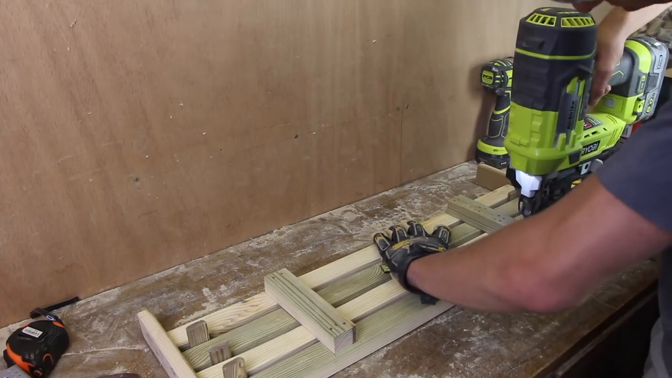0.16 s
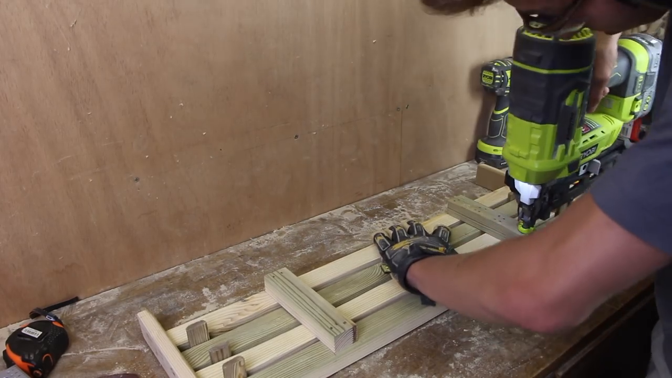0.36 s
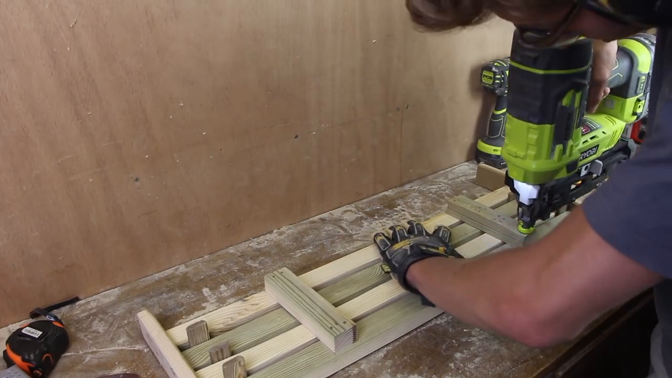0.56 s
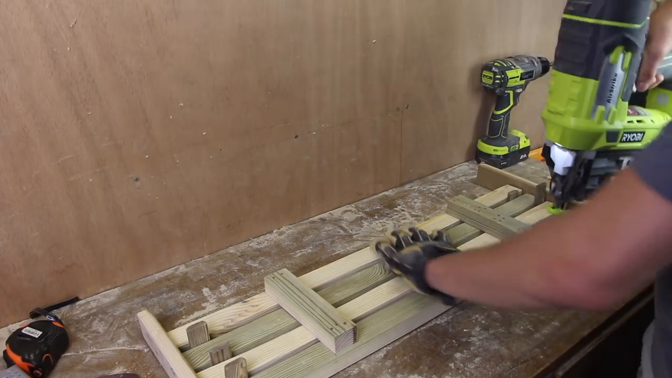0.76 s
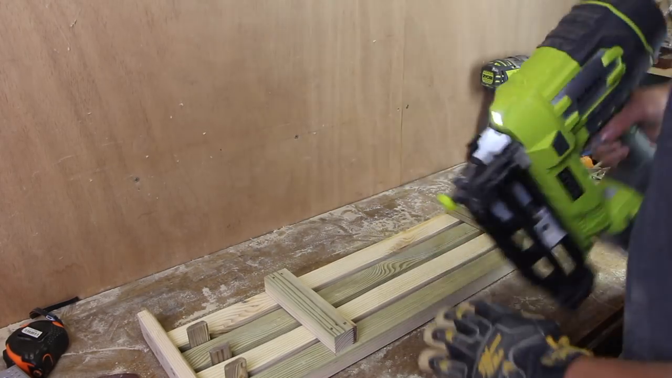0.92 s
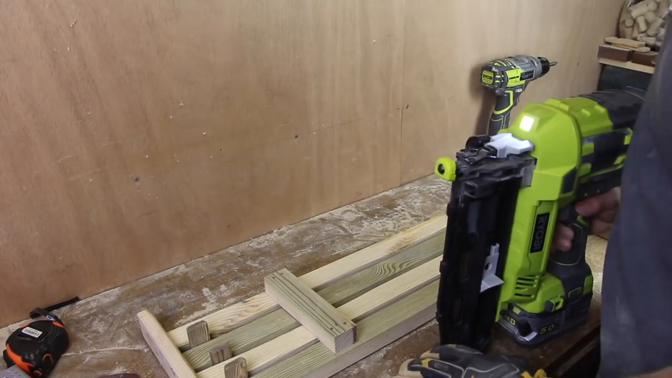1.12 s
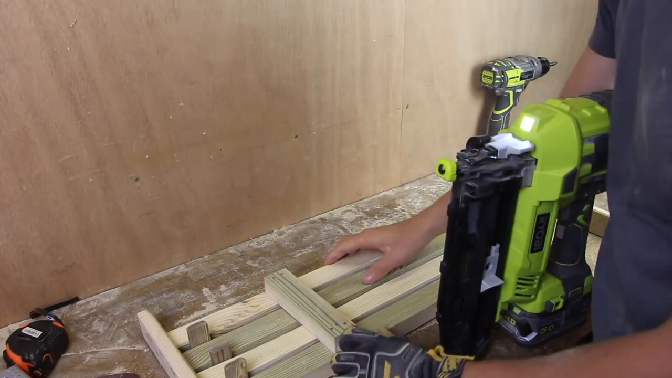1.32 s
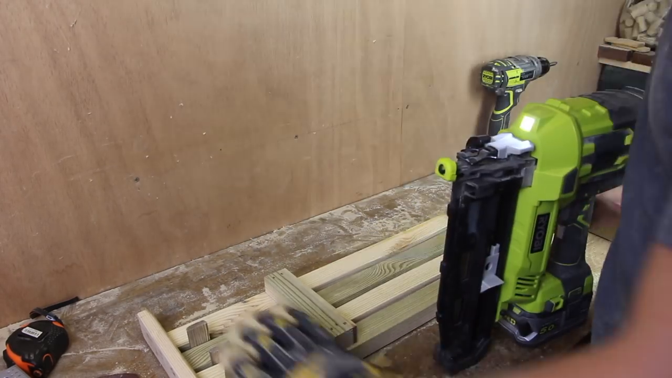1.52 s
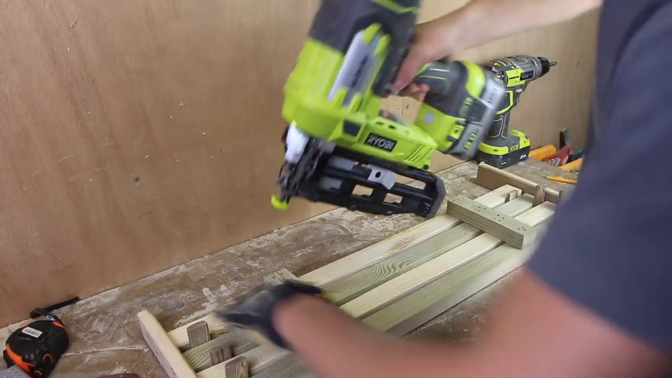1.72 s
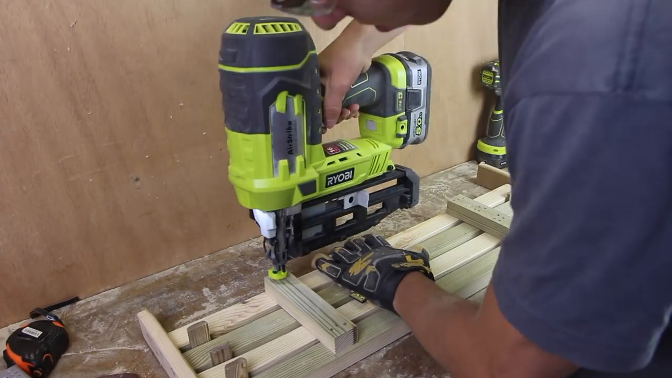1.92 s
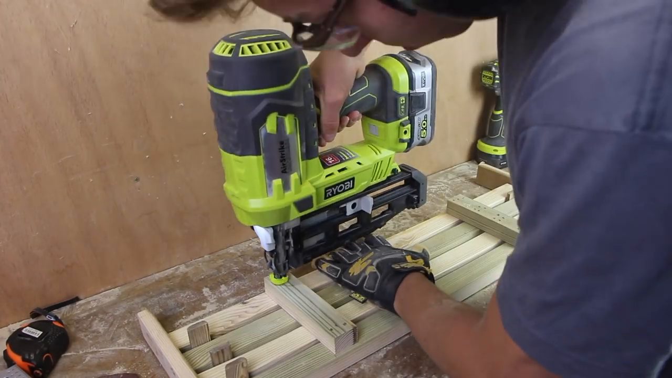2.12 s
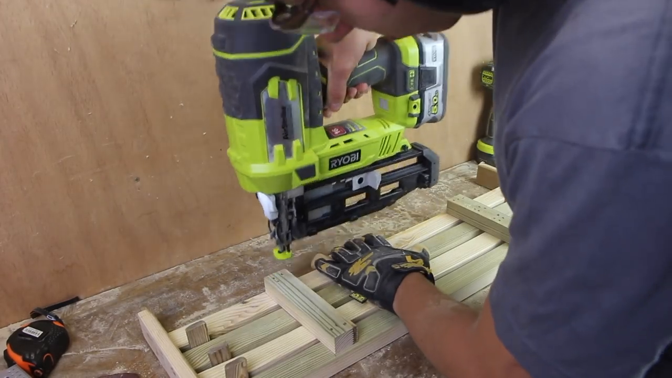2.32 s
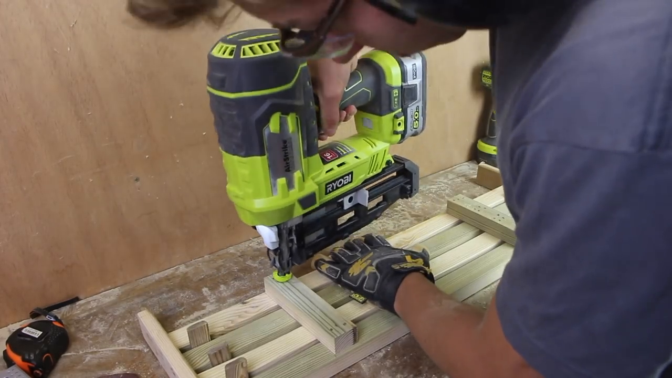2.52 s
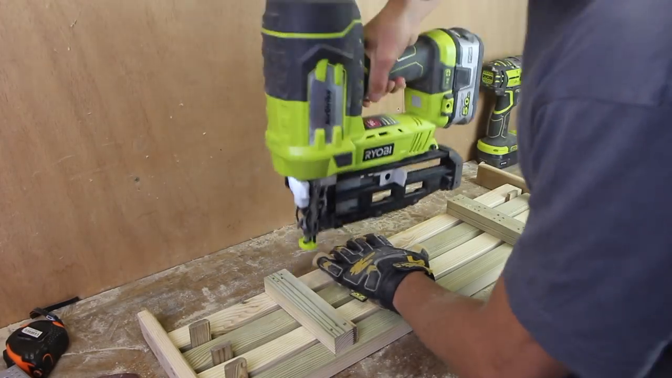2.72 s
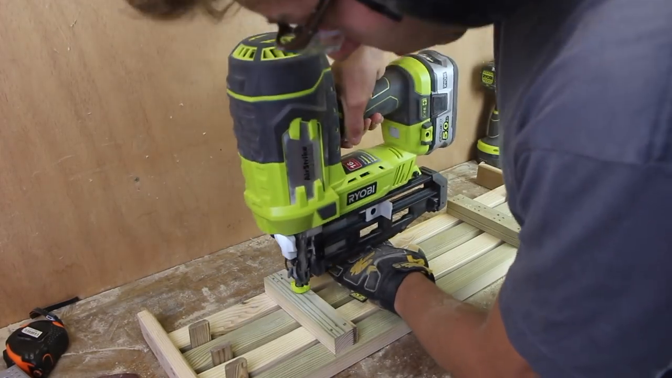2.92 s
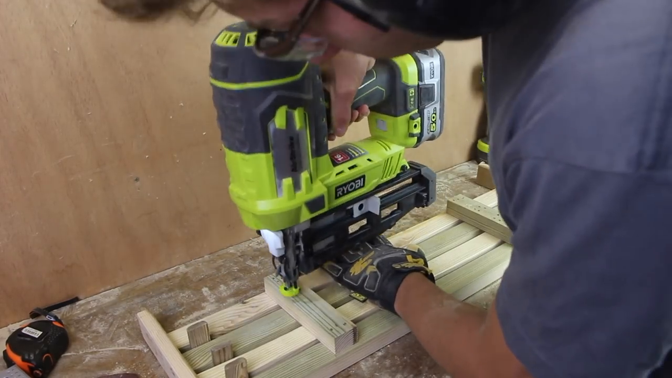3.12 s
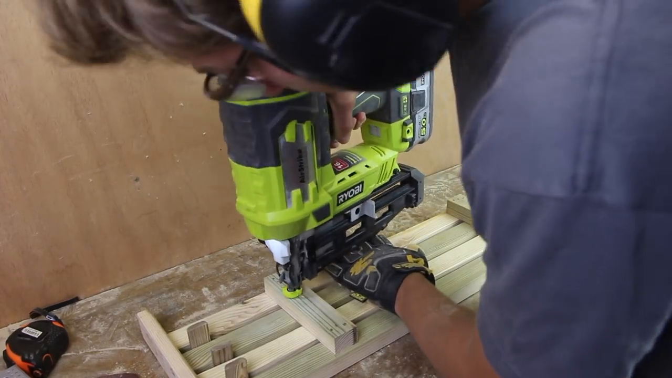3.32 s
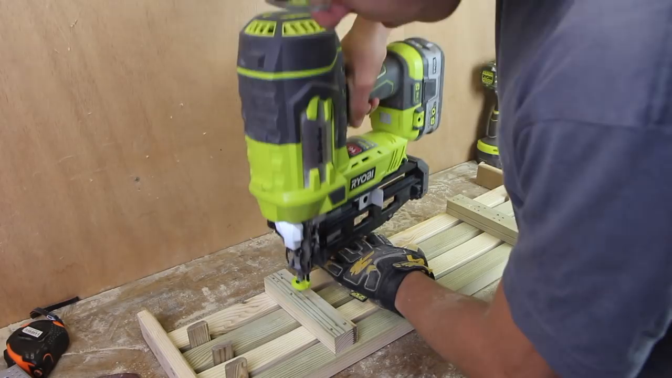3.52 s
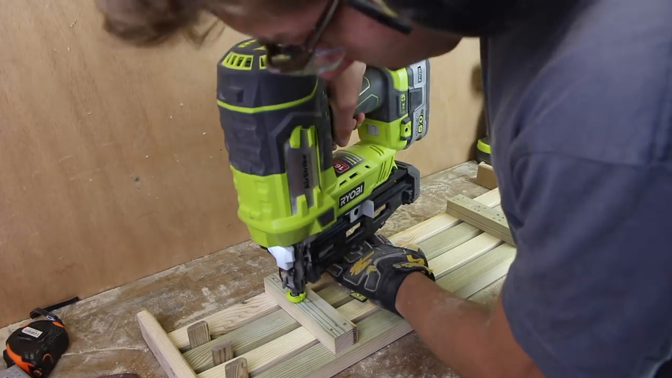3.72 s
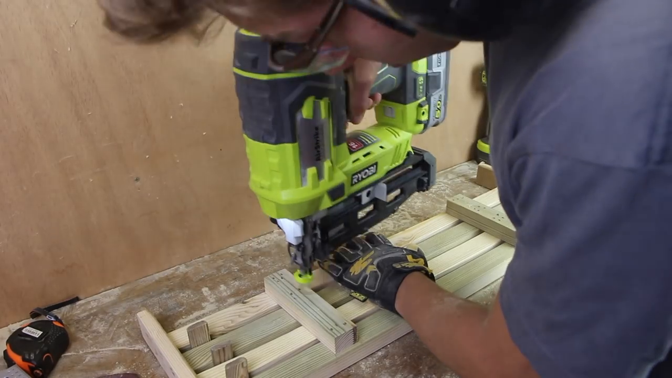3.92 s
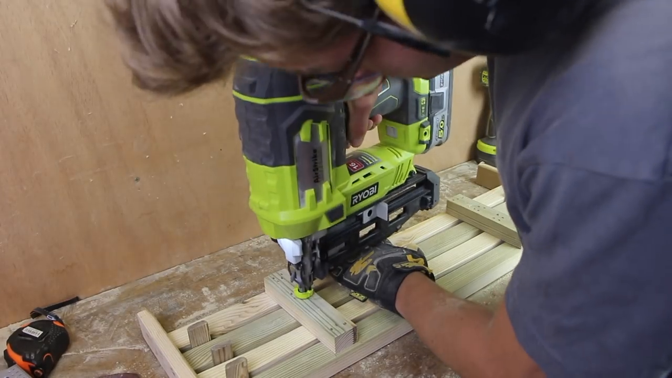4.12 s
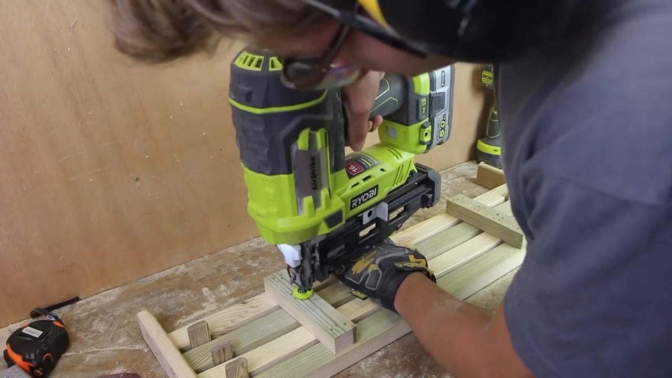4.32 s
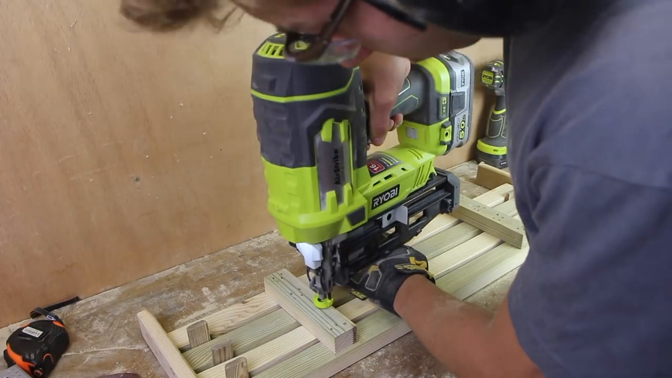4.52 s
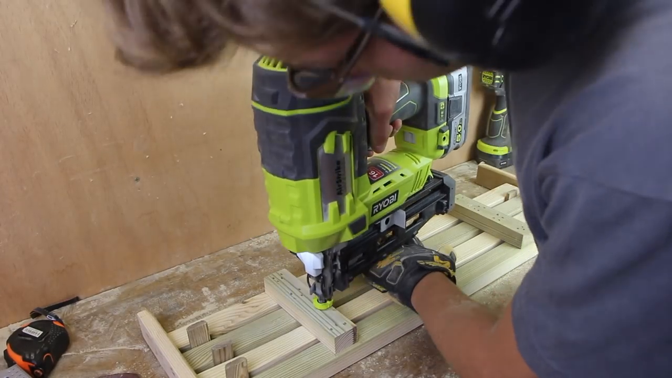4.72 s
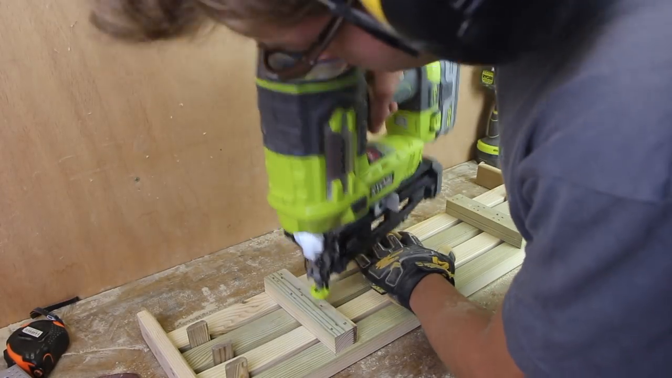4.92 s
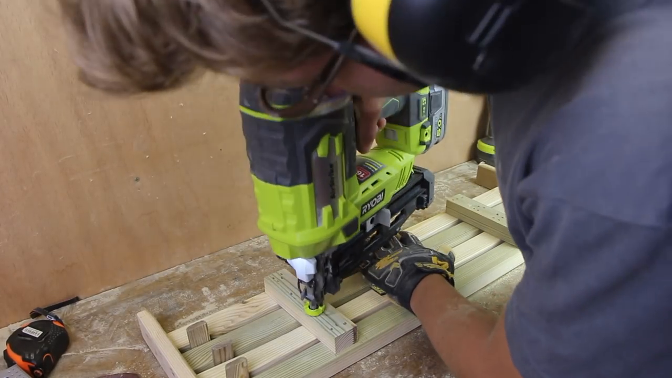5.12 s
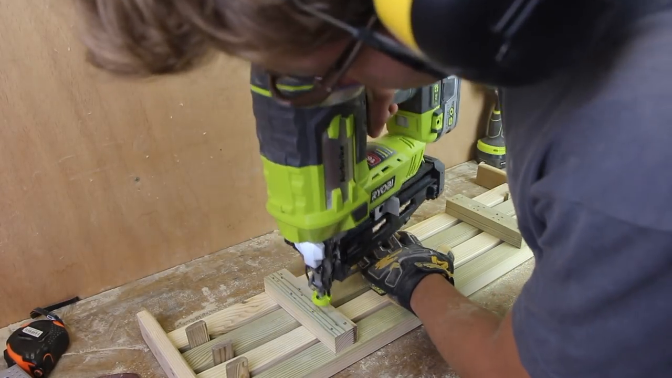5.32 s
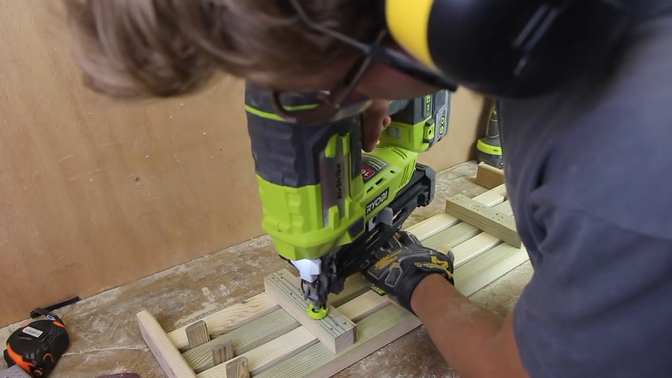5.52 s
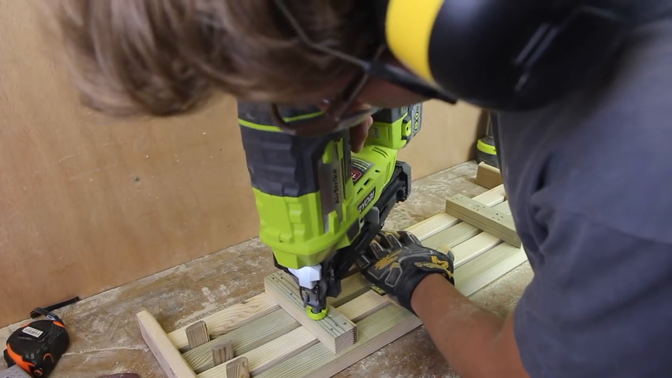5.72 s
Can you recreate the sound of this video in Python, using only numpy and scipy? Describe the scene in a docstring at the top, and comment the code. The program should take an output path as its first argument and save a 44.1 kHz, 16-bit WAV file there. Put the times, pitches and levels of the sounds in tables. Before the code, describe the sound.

A cordless nailer whirs up and snaps nails into wooden slats three times, with clicks, knocks and sliding rattles between, over faint hum.

```python
"""A cordless nailer pins wooden slats on a workbench, close up and nearly mono, over mains hum and hiss.
First the foot scuffs the wood, handling clicks and the slats knock; then the motor whistles and winds up
through its gears, the driver snaps in a nail and the gears run out. The tool lands on the bench; between shots
loose parts tick, the sprung nose slides and once squeaks. Two more shots follow, then a last wind-up.
Sounds are shaped noise and sines: enveloped strikes, gated strokes, gear-tooth harmonics, resonant bodies."""
import sys
import numpy as np
from scipy import signal
from scipy.fft import rfft, irfft, next_fast_len
from scipy.io import wavfile
from scipy.ndimage import uniform_filter1d, map_coordinates

SR = 44100
rng = np.random.default_rng(int(sys.argv[2]) if len(sys.argv) > 2 else 0)


def int16_out(signal):
    """Quantize to a 16-bit WAV file."""
    q = np.round(np.clip(np.atleast_2d(signal).T, -1, 1) * 32767)
    wavfile.write(sys.argv[1], SR, q.astype(np.int16))


N = 254016
T = np.arange(N) / SR

# Event levels are before the trims and envelopes in the functions; spectra and modes are relative.
# mains hum: (time [s], level [dB])
HUM_LEVEL = [(0, -55), (1.45, -54), (1.6, -58), (5.76, -60)]
# thin high hiss that drops away halfway: (time [s], level [dB])
SIZZLE_LEVEL = [(0, -81.5), (3.05, -75.5), (3.2, -92)]
# foot scuffing the wood: (time [s], level [dB], length [s], pitch [Hz])
SCUFFS = [(0.154, -61.5, 0.083, 370), (2.03, -51.5, 0.086, 414), (3.666, -69.5, 0.13, 620)]
# glove and sleeve brushing: (time [s], level [dB], length [s])
BRUSHES = [(0.8, -54.5, .17), (1.117, -55, 0.07), (1.162, -64, 0.299), (1.483, -53.5, 0.047),
           (1.549, -67, 0.1), (1.716, -61, .15), (2.892, -63.5, 0.084), (4.599, -56.5, .13)]
# handling clicks, a few of them very short ticks: (time [s], body [dB], edge [dB], t60 [s])
CLICKS = [(0.233, -49.5, -66, 0.075), (0.271, -41, -51.5, 0.046), (0.747, -38, -44.5, .019),
          (0.818, -41.5, -48.5, 0.025), (1.031, -47, -54, 0.063), (1.043, -47.5, -51.5, 0.044),
          (1.138, -36, -39.5, 0.065), (1.283, -57.5, -70, 0.077), (1.372, -57, -58, 0.073),
          (1.511, -54, -59.5, .025), (2.069, -51, -61, .056), (2.138, -57, -68, .046),
          (2.361, -33, -34.5, .025), (2.529, -51, -75.5, 0.13), (2.62, -49.5, -72, .1),
          (2.655, -51, -65, 0.11), (2.694, -26, -34.5, 0.0026), (2.75, -22.5, -25, 0.024),
          (2.902, -41.5, -52, 0.044), (2.932, -36, -48, 0.0065), (3.096, -50, -45.5, .02),
          (3.523, -30.5, -32, 0.016), (3.978, -34.5, -37, 0.024), (4.227, -49, -61, .04),
          (4.241, -37.5, -49, 0.081), (4.303, -36, -36.5, 0.029), (4.483, -41.5, -56, 0.009),
          (4.533, -47.5, -57, .003), (4.61, -44.5, -47, 0.044), (5.034, -33.5, -32.5, .034),
          (5.086, -29.5, -30, .0033), (5.125, -54, -66, 0.11), (5.356, -30, -30, 0.035),
          (5.528, -60.5, -69, .057), (5.726, -49, -47, 0.06)]
# knocks on slats and bench: (time [s], boom [dB], pitch [Hz], t60 [s], clack [dB])
KNOCKS = [(0.24, -48.5, 354, .024, -45.5), (0.362, -45.5, 136.5, .1, -45), (0.578, -35.5, 211, 0.052, -31),
          (0.725, -35, 208.7, 0.087, -55), (1.07, -45.5, 357, 0.21, -41.5), (1.138, -29, 288, 0.043, -26.5),
          (1.375, -55.5, 112, 0.062, -48.5), (2.035, -44.5, 160.5, 0.15, -52),
          (2.304, -46.5, 200, 0.11, -47), (2.716, -23.5, 196, 0.031, -48.5),
          (2.906, -47.5, 150.6, 0.24, -46.5), (3.087, -46.5, 224, 0.29, -56), (3.255, -40.5, 174, .11, -40),
          (3.427, -53.5, 513, 0.044, -57), (3.489, -24, 199, 0.056, -35), (4.229, -35, 129, 0.032, -35.5),
          (4.241, -36.5, 140, 0.097, -39.5), (4.333, -32.5, 238, 0.055, -26),
          (4.347, -38, 189.6, 0.021, -24.5), (4.366, -36, 238, 0.045, -34.5),
          (4.582, -38.5, 166, 0.24, -48.5), (5.27, -42, 177, 0.091, -37.5), (5.324, -35, 228, 0.075, -63),
          (5.486, -48.5, 145.4, 0.3, -54.5)]
# motor winding up: (time [s], length [s], time to reach speed [s], gear rattle [dB], gear whine [dB],
# drive whistle [dB])
WIND_UPS = [(0.57, .081, .027, -41.5, -31.5, -33.5), (4.319, .097, 0.052, -39, -31.5, -29),
            (4.871, .095, 0.0038, -40, -34, -59.5), (5.749, .09, .04, -42, -46, -32.5)]
# lowest gear tone standing out: (time [s], level [dB], length [s], tooth rate [Hz])
DRONES = [(0.577, -35, 0.02, 1380), (4.335, -35, 0.04, 1345), (4.875, -40, 0.2, 1598)]
# faint gear chirps: (time [s], level [dB], length [s])
CHIRPS = [(2.255, -55, .039), (3.846, -56.5, 0.031), (5.23, -54.5, 0.036)]
# nails driven: (time [s], crack [dB], thud [dB], air puff [dB])
SHOTS = [(0.653, -24.5, -31.5, -35.5), (4.419, -19, -23.5, -29.5), (4.966, -22.5, -26, -30.5)]
# sliding parts, gears running out or nose pressed or let go: (time [s], swell [s], hold [s], fade [s],
# body [dB], rasp [dB], nose ring [dB])
STROKES = [(0.676, 0.028, 0.04, .036, -38.5, -35.5, -41.5), (1.064, .004, 0.031, 0.08, -48.5, -52.5, -70),
           (2.305, 0.06, 0.052, 0.087, -39.5, -39, -49), (2.702, 0.0022, 0.061, 0.066, -36, -36, -42),
           (3.082, 0.011, .004, 0.073, -45, -49, -50), (3.484, 0.0035, .012, .11, -38.5, -38, -41),
           (3.884, 0.037, 0.034, .092, -38.5, -33, -45), (4.418, 0.0016, 0.054, .002, -36.5, -48, -63),
           (4.966, 0.0016, 0.11, 0.0018, -38, -33.5, -46), (5.268, 0.082, 0.049, 0.097, -40, -40.5, -48.5)]
# nailer's weight landing on the bench: (time [s], level [dB])
LANDING = (1.138, -27)
# squeak of the nose in its guide: (level [dB], t60 [s], pitch [Hz])
SQUEAK = (-26, 0.02, 3570)

# gear whine: (multiple of tooth rate, level [dB])
TEETH = [(1, -7), (2, -13.5), (3, 0.5), (4, -2.5), (5, -16), (6, -22.5)]
# modes of the whole bench: (frequency [Hz], level [dB], t60 [s])
BENCH_MODES = [(62, -7, 0.12), (113, -1.5, 0.07), (181, -1.5, 0.065), (471, 1.5, 0.04)]
# resonances of the nailer's body: (frequency [Hz], width [Hz], level [dB])
HOUSING = [(234, 47.5, 15), (840, 380, -2.5), (1320, 140, 1.5), (1580, 110, 2.5), (2500, 350, 4),
           (3560, 75, 9), (3885, 21, 15), (4530, 120, -2), (5140, 143, 4.5), (5700, 200, 3)]
# resonances of the pinned slats: (frequency [Hz], width [Hz], level [dB])
SLATS = [(360, 27, 2.5), (579, 47, 7), (880, 37, 4.5), (1154, 55, 5.5), (1324, 44, 4.5), (1443, 40, 7.5)]
# reverberation: (frequency [Hz], t60 [s])
ROOM_T60 = [(150, 0.16), (1000, .18), (4000, 0.048), (12000, 0.18)]

# noise spectra, each: (frequency [Hz], level [dB per Hz])
# room hiss
AIR_SPECTRUM = [(25, 2.5), (80, 14.5), (200, 11.5), (400, 3.5), (1000, 3), (2500, -0.5), (6000, -5),
                (8000, -4.5), (15500, -7)]
# room rumble
RUMBLE_SPECTRUM = [(20, -9), (70, 5), (170, -2.5), (300, -7.5), (600, -12), (1500, -22), (5000, -52.5)]
# brushing cloth
CLOTH_SPECTRUM = [(100, 13), (500, 0.5), (1500, 3.5), (3500, 2.5), (6500, -6.5), (10000, -13.5),
                  (16000, -17)]
# body of a click or loose-part tick
TICK_SPECTRUM = [(100, -14.5), (400, 0.5), (1200, 2), (2200, 2), (3600, -3.5), (4800, -28), (8000, -52)]
# steel rasp and click edge
RASP_SPECTRUM = [(1500, -35.5), (3000, 0), (4000, -1), (6000, 2), (7500, -6.5), (11000, -11), (16000, -16)]
# woody clack of a knock
CLACK_SPECTRUM = [(60, -2.5), (150, 8), (400, -4.5), (800, -4), (1400, -9), (2400, -15), (5000, -25.5),
                  (12000, -51.5)]
# gear rattle
RATTLE_SPECTRUM = [(60, -42), (160, -19), (250, 4.5), (420, -14), (650, -4), (950, 1), (1400, 2),
                   (2100, -2.5), (3200, 2), (4200, -6), (5800, 0), (7500, -9), (11000, -15), (16000, -18)]
# driver crack
CRACK_SPECTRUM = [(80, -16), (200, 10.5), (420, -13), (800, 5.5), (1400, -2), (1800, 7.5), (2200, -1.5),
                  (3700, -1.5), (6000, -8.5), (8000, -12.5), (16000, -18.5)]
# shot thud
THUD_SPECTRUM = [(60, -23), (150, 5.5), (400, -7.5), (750, -2.5), (1300, -8.5), (1900, -12.5), (4000, -36),
                 (12000, -59)]
# body of a stroke
BODY_SPECTRUM = [(60, -31.5), (150, -1.5), (240, -5), (480, -6.5), (800, 0.5), (1400, 2), (2100, -4.5),
                 (3200, -8), (4500, -10.5), (8000, -41)]
# bench shaken by a stroke
BENCH_SPECTRUM = [(90, -22), (160, -2), (215, 0), (300, -5.5), (420, -19.5), (900, -45.5)]
# thin high hiss
SIZZLE_SPECTRUM = [(6000, -37.0), (7400, -3), (7900, -3.5), (8500, -5.5), (10500, -41.5)]
# left-right difference
SIDE_SPECTRUM = [(20, -3.0), (1000, -2), (4000, -5.5), (16000, 0.5)]

HISS_DB = -70  # also scales the rumble
DIP_HISS_DB, DIP_HUM_DB = 7, 13  # deepest sink of the background around a loud sound
DIP_KNEE_DB, DIP_HOLD_S = -41.5, 0.11  # tool level giving half the dip; how long it lingers
SCUFF_WIDTH = 0.3  # band as a share of pitch
WHISTLE_S = 0.017  # whistles only while the rotor gets moving
TOOTH_HZ, TOOTH_SAG_HZ_PER_S = 1652, 800  # tooth rate sags as the piston is loaded
WHINE_SWELL_DB, WHINE_SAG_DB_PER_S = 18, 49  # grows up to speed, then weakens under load
SWELL_DB, SAG_DB_PER_S, FADE_DB = 10, 53.5, 21.5  # stroke: swells, slackens while held, fades
RASP_GROWS, RING_GROWS = 1.41, 1.4  # exponents: both follow stroke speed more steeply than the body
BENCH_FOLLOW_DB, BENCH_LAG_S = -11, 0.037  # bench takes up each stroke and rings on
HANDLING_START_S, HANDLING_END_S, TICKS_PER_S = 1.2, 2.25, 5
TICK_DB, TICK_SPREAD_DB, TICK_T60_S = -65, 1, 0.098
SQUEAK_S = 3.977
TOP_HZ = 16100


def amp(db):
    """Decibels to gain."""
    return 10 ** (np.asarray(db) / 20)


def unit(x):
    """Scale to rms 1."""
    return x / np.sqrt(np.mean(x ** 2) + 1e-20)


def along(points, hz):
    """Interpolate (Hz, value) points on a log frequency axis."""
    point_hz, values = np.transpose(points)
    return np.interp(np.log(hz + 1), np.log(point_hz + 1), values)


def filtered(x, response):
    """Multiply the spectrum of x by a response of frequency."""
    size = next_fast_len(N + 8192)
    spectrum = rfft(x, size) * response(np.fft.rfftfreq(size, 1 / SR))
    return irfft(spectrum, size)[..., :N]


def wobble(rate_hz):
    """Smooth random curve with rate_hz knots a second."""
    knots = rng.standard_normal(int(N * rate_hz / SR) + 4)
    return map_coordinates(knots, [T * rate_hz])


def noise(spectrum, body=np.ones_like, grain_db=0):
    """Noise of rms 1, clumped into millisecond grains and coloured by a spectrum and a body."""
    grains = rng.standard_normal(N)
    if grain_db:
        grains = grains * amp(grain_db * wobble(700))
    return unit(filtered(grains, lambda hz: amp(along(spectrum, hz)) * body(hz)))


def resonant(modes):
    """Complex response of a body, with a peak or dip at each mode."""
    return lambda hz: 1 + sum((amp(db) - 1) / (1 + 2j * (hz - centre_hz) / width_hz)
                              for centre_hz, width_hz, db in modes)


def strike(s, t60, rise):
    """Envelope of a contact: builds up to 1 at s + rise, then dies away."""
    env = np.zeros(N)
    first, last = max(int(s * SR), 0), int((s + rise + 1.5 * t60) * SR)
    t = T[first:last] - s
    env[first:last] = np.clip(t / rise, 0, 1) * amp(-60 * np.maximum(t - rise, 0) / t60)
    return env


def gate(s, length, edge):
    """1 during a movement, with sloping edges."""
    return np.clip(np.minimum(T - s, s + length - T) / edge, 0, 1)


def phase(hz, jitter, rate_hz):
    """Phase of a tone whose speed is unsteady."""
    return 2 * np.pi * np.cumsum(hz * (1 + jitter * wobble(rate_hz))) / SR


def background(tool, mains_hz=51.0):
    """Mains hum, room rumble and hiss; all dip while the tool is loud and just after."""
    width = max(int(DIP_HOLD_S * SR), 2)
    # the averaging window looks back, so the dip lingers
    power = np.abs(uniform_filter1d(tool ** 2, width, origin=(width - 1) // 2))
    dip = power / (power + amp(DIP_KNEE_DB) ** 2)
    hum_db = np.interp(T, *np.transpose(HUM_LEVEL)) - DIP_HUM_DB * dip + 1.2 * wobble(9)
    hum = amp(hum_db) * unit(np.sin(phase(mains_hz, jitter=0.002, rate_hz=3)))
    rumble = amp(5 + 2.4 * wobble(5.34)) * noise(RUMBLE_SPECTRUM)
    sizzle = amp(np.interp(T, *np.transpose(SIZZLE_LEVEL))) * noise(SIZZLE_SPECTRUM)
    hiss = amp(HISS_DB) * (noise(AIR_SPECTRUM) + rumble)
    return hum + amp(-DIP_HISS_DB * dip) * (sizzle + hiss)


def rub(centre_hz):
    """Narrow, rough noise band of rms 1."""
    def band(hz):
        return 1 / (1 + (2 * (hz / centre_hz - 1) / SCUFF_WIDTH) ** 2)
    return unit(filtered(rng.standard_normal(N), band))


def brushes():
    """The foot scuffs the wood in a narrow band; cloth drags unevenly as the tool is moved."""
    scuffs = sum(amp(db - 3) * gate(s, length, 0.017) * rub(hz) for s, db, length, hz in SCUFFS)
    drag = sum(amp(db) * gate(s, length, 0.029) for s, db, length in BRUSHES)
    return scuffs + amp(2 * wobble(45)) * drag * noise(CLOTH_SPECTRUM, grain_db=1.5)


def clicks():
    """Handling clicks, a few very short: housing-coloured noise with a bright edge."""
    body = sum(amp(db - 0.5) * strike(s - 0.001, t60, rise=0.0024) for s, db, _, t60 in CLICKS)
    edge = sum(amp(db + 3.5) * strike(s - 0.001, t60, rise=0.0014) for s, _, db, t60 in CLICKS)
    housing = resonant(HOUSING)
    return body * noise(TICK_SPECTRUM, housing) + edge * noise(RASP_SPECTRUM, housing)


def knocks(bench_hz=228, bench_db=-20, bench_t60_s=0.33, smoothing_s=0.0066):
    """Slats boom at a pitch set by where they are struck; a woody clack leads, the bench rings on."""
    boom, clack, bench = np.zeros((3, N))
    turns = rng.uniform(0, 2 * np.pi, (len(KNOCKS), 2))
    for (s, db, hz, t60, clack_db), (low_turn, high_turn) in zip(KNOCKS, turns):
        # smooth each knock's envelope, for a soft, rounded onset
        rounded = uniform_filter1d(strike(s, t60, rise=0.0058), max(int(smoothing_s * SR), 1))
        swing = amp(db + 3.5) * rounded
        live = swing > 1e-6
        angle = 2 * np.pi * hz * (T[live] - s)
        low = amp(-12.0) * np.sin(0.7 * angle + low_turn)
        high = amp(-18.5) * np.sin(1.7 * angle + high_turn)
        boom[live] += swing[live] * (np.sin(angle) + low + high)
        clack += amp(clack_db - 1) * strike(s, 0.98 * t60, rise=0.0018)
        bench += amp(db + bench_db) * strike(s, bench_t60_s, rise=0.005)
    slats = resonant(SLATS)
    woody = clack * noise(CLACK_SPECTRUM, lambda hz: slats(hz) ** 1.37)
    return boom + woody + bench * np.sin(phase(bench_hz, jitter=0.0601, rate_hz=80))


def motor(mesh_hz=1605, line_hz=140, drive_hz=3905, chirp_rattle_db=-6, fuzzy_db=-3, clean_db=-4):
    """The switched drive whistles, then the gears whine and rattle, slowing a little under load."""
    rattle, whine, current, loaded_s = np.zeros((4, N))
    for s, length, spin_up, rattle_db, whine_db, whistle_db in WIND_UPS:
        running = gate(s - 0.0015, length + 0.00316, 0.0026)
        speed = np.clip((T - s) / spin_up, 0, 1)
        sag_db = WHINE_SAG_DB_PER_S * np.clip(T - s - spin_up, 0, length)
        rattle += amp(rattle_db + 2.5) * running
        whine += amp(whine_db - WHINE_SWELL_DB * (1 - speed) - sag_db) * running
        current += amp(whistle_db) * gate(s - 0.002, WHISTLE_S, 0.0027)
        loaded_s += (T - s) * (running > 0)
    chirps = sum(amp(db) * gate(s, length, 0.0023) for s, db, length in CHIRPS)

    # teeth mesh unevenly: each multiple of the tooth rate is a line with a fuzzy skirt
    def lines(hz):
        return sum(amp(db) / (1 + ((hz - k * mesh_hz) / line_hz) ** 2) for k, db in TEETH)

    fuzzy = unit(filtered(rng.standard_normal(N), lines))
    meshing = phase(TOOTH_HZ - TOOTH_SAG_HZ_PER_S * loaded_s, jitter=0.012, rate_hz=400)
    clean = unit(sum(amp(db) * np.sin(k * meshing) for k, db in TEETH))
    gears = (amp(fuzzy_db) * whine + chirps) * fuzzy + amp(clean_db) * whine * clean
    drone = sum(amp(db) * gate(s, length, 0.0027) * unit(np.sin(phase(hz, jitter=0.045, rate_hz=500)))
                for s, db, length, hz in DRONES)
    switching = phase(drive_hz, jitter=0.011, rate_hz=280)
    overtones = amp(-24) * np.sin(2 * switching) + amp(-21) * np.sin(3 * switching)
    whistle = current * unit(np.sin(switching) + overtones)
    clatter = (rattle + amp(chirp_rattle_db) * chirps) * noise(RATTLE_SPECTRUM, grain_db=2)
    return gears + drone + whistle + clatter


def shots(puff_hz=95):
    """The piston lets go with a thud and a puff of air; the driver then cracks the nail home."""
    crack, thud, puff = np.zeros((3, N))
    for s, crack_db, thud_db, puff_db in SHOTS:
        crack += amp(crack_db + 2.5) * strike(s - 0.0025, t60=0.041, rise=0.002)
        thud += amp(thud_db) * strike(s - 0.012, t60=0.066, rise=0.0032)
        cycles = (T - s + 0.0039) * puff_hz
        bell = np.exp(-np.minimum(1.9 * cycles ** 2, 50))
        puff -= amp(puff_db) * np.cos(2 * np.pi * cycles) * bell
    return crack * noise(CRACK_SPECTRUM) + thud * noise(THUD_SPECTRUM, resonant(SLATS)) + puff


def stroke_speed(s, swell, hold, fade):
    """Speed of a sliding part: it swells to 1, slackens while held, fades and stops."""
    t = T - s
    loss_db = (SWELL_DB * np.clip(1 - t / swell, 0, 1) + SAG_DB_PER_S * np.clip(t - swell, 0, hold)
               + FADE_DB * np.clip((t - swell - hold) / fade, 0, 1))
    return amp(-loss_db) * gate(s, swell + hold + fade, 0.001)


def strokes(ring_hz=3912):
    """Sliding steel and plastic rasp in the housing and shake the bench; the loose nose chatters, rings."""
    body, rasp, ring = np.zeros((3, N))
    for s, swell, hold, fade, body_db, rasp_db, ring_db in STROKES:
        speed = stroke_speed(s, swell, hold, fade)
        body += amp(body_db) * speed
        rasp += amp(rasp_db - 3.0) * speed ** RASP_GROWS
        ring += amp(ring_db) * speed ** RING_GROWS
    flutter = amp(3 * np.clip(wobble(220), -2, 1.5))
    steel = flutter * np.sin(2 * np.pi * ring_hz * T + 1.1 * wobble(200))
    keep = np.exp(-1 / (BENCH_LAG_S * SR))
    lagged = signal.lfilter([1 - keep], [1, -keep], body)
    bench = amp(BENCH_FOLLOW_DB) * lagged * noise(BENCH_SPECTRUM)
    housing = resonant(HOUSING)
    slide = body * noise(BODY_SPECTRUM, housing, grain_db=1.5)
    scrape = rasp * noise(RASP_SPECTRUM, housing, grain_db=2.5)
    return slide + scrape + ring * steel + bench


def landing():
    """The whole bench gives a dull bump under the tool."""
    s, db = LANDING
    return sum(amp(db + mode_db) * strike(s, t60, rise=0.003) * np.sin(2 * np.pi * hz * (T - s))
               for hz, mode_db, t60 in BENCH_MODES)


def loose_parts():
    """Faint chance ticks in the housing while the tool is carried."""
    count = max(round((HANDLING_END_S - HANDLING_START_S) * TICKS_PER_S), 1)
    ticks = np.zeros(N)
    for k, (late, size) in enumerate(rng.uniform(-1, 1, (count, 2))):
        s = HANDLING_START_S + (k + (1 + late) / 2) / TICKS_PER_S
        ticks += amp(TICK_DB + TICK_SPREAD_DB * size) * strike(s, TICK_T60_S, rise=0.0036)
    return ticks * noise(TICK_SPECTRUM, resonant(HOUSING))


def squeak():
    """The nose sticks for an instant and squeaks: a decaying, unsteady sine."""
    db, t60, hz = SQUEAK
    tone = np.sin(phase(hz, jitter=0.0059, rate_hz=200))
    return amp(db) * strike(SQUEAK_S, t60, rise=0.002) * tone


def patchy(x, depth_db):
    """Random patches of gain over time and frequency make the tone uneven."""
    z = signal.stft(x, nperseg=512)[2]
    field = uniform_filter1d(rng.standard_normal(z.shape), 2, axis=0)
    field = uniform_filter1d(field, 12, axis=1)
    gain = amp(depth_db * np.clip(unit(field), -2, 2))
    return signal.istft(z * gain, nperseg=512)[1][:N]


def workshop(x):
    """A short answer from the bench and the plywood wall: decaying noise, convolved."""
    hz, t, z = signal.stft(rng.standard_normal(SR // 3), SR, nperseg=256)
    decay = amp(-60 * t / along(ROOM_T60, hz)[:, None])
    tail = signal.istft(z * decay, SR, nperseg=256)[1]
    return signal.fftconvolve(x, tail / np.linalg.norm(tail))[:N]


def scene():
    """Everything sits in the middle, with only a trace of width."""
    uneven = patchy(brushes() + clicks() + motor() + strokes(), depth_db=2.2)
    tool = uneven + knocks() + shots() + landing() + loose_parts() + squeak()
    mid = tool + amp(-28.0) * workshop(tool) + background(tool)
    side = amp(-78) * noise(SIDE_SPECTRUM)
    return np.array([mid + side, mid - side])


def record(dry):
    """Round off the highest peaks, then remove everything from TOP_HZ up."""
    top, hardness = 0.19, 4
    rounded = dry / (1 + np.abs(dry / top) ** hardness) ** (1 / hardness)
    return filtered(rounded, lambda hz: hz < TOP_HZ)


dry = scene()
out = record(dry)
int16_out(out)
```